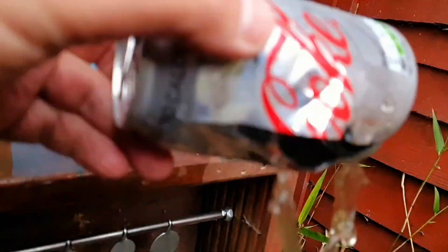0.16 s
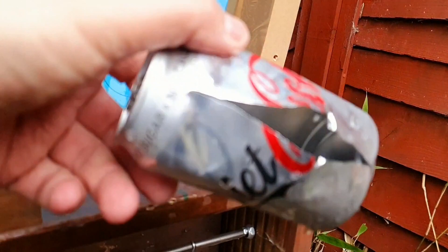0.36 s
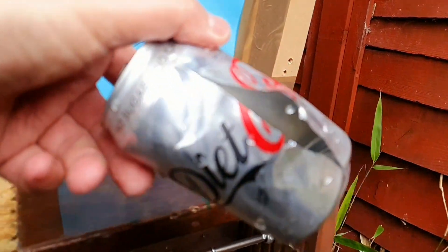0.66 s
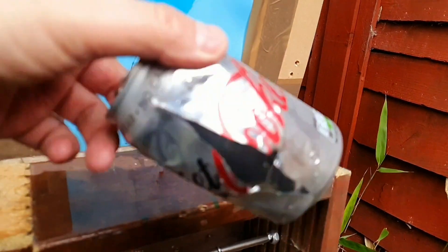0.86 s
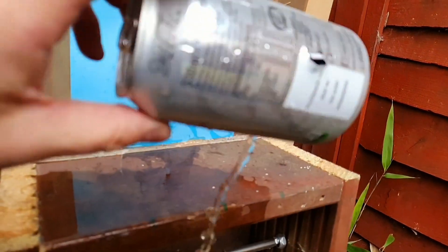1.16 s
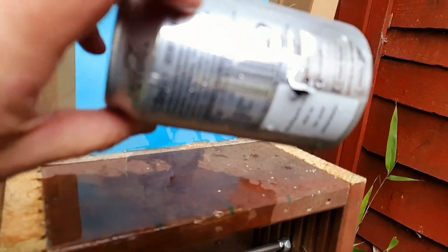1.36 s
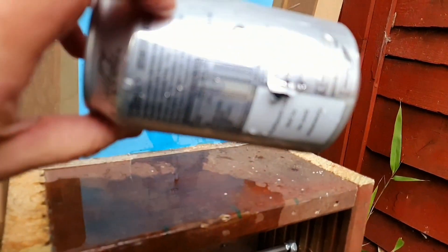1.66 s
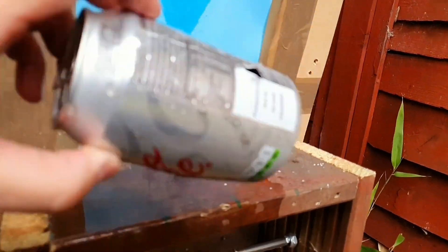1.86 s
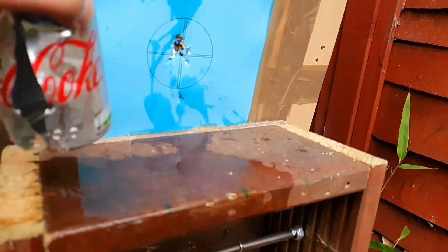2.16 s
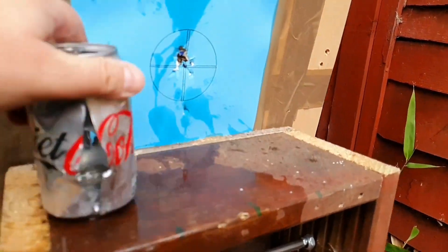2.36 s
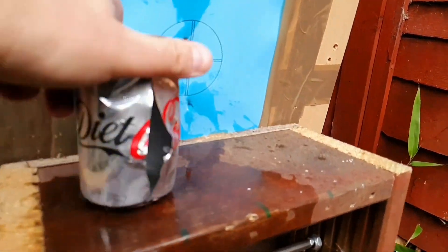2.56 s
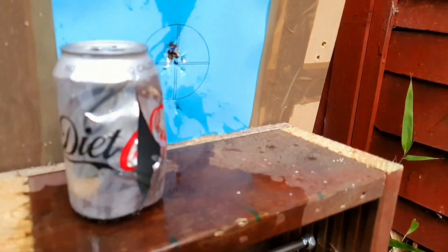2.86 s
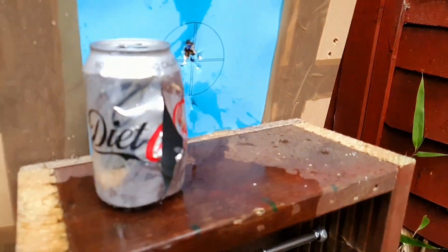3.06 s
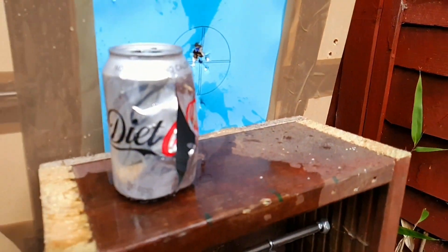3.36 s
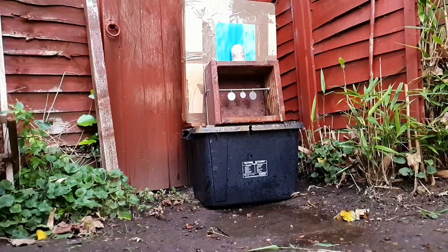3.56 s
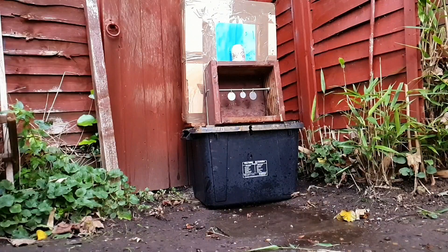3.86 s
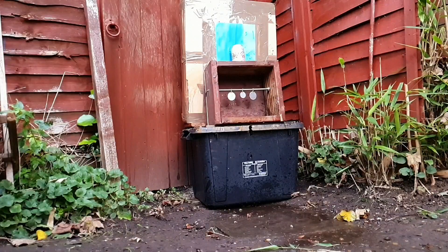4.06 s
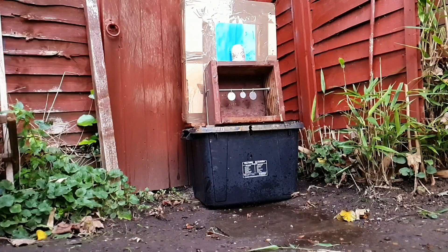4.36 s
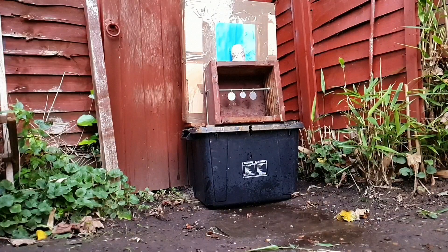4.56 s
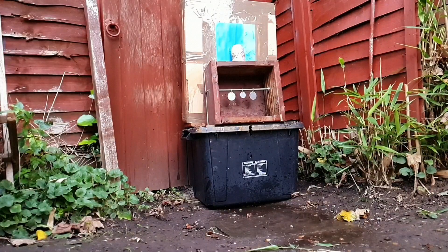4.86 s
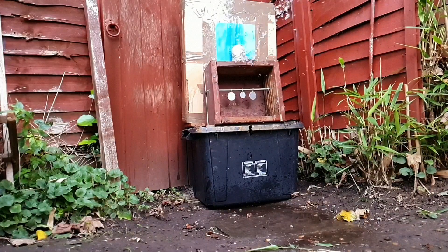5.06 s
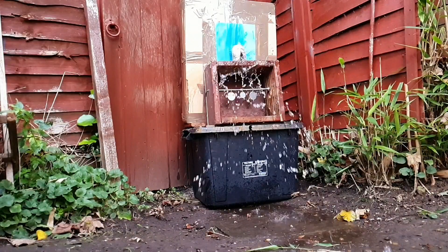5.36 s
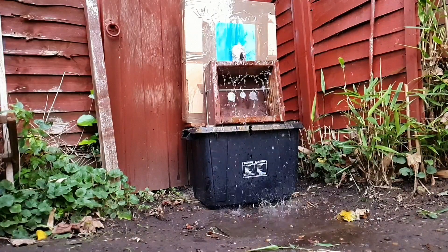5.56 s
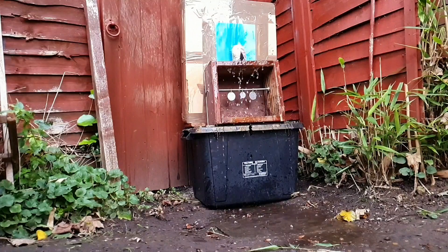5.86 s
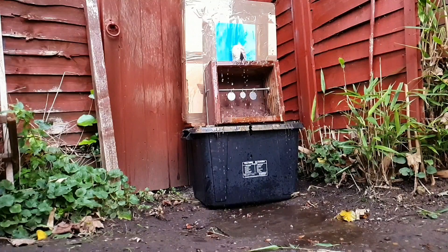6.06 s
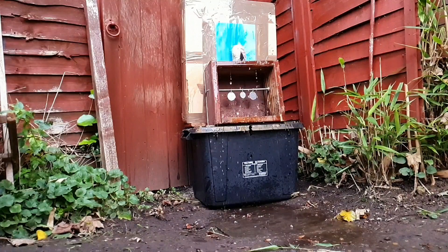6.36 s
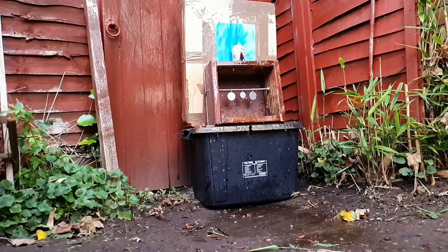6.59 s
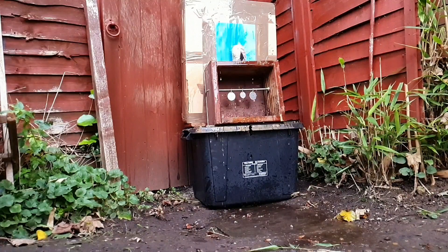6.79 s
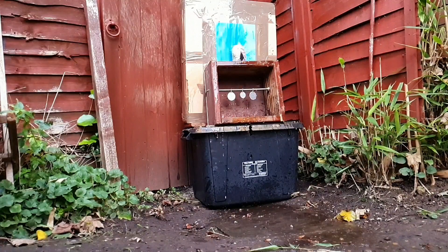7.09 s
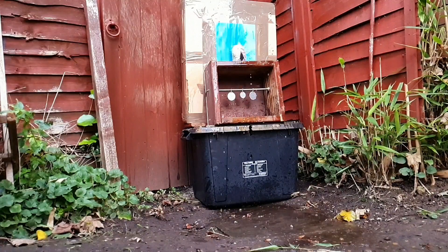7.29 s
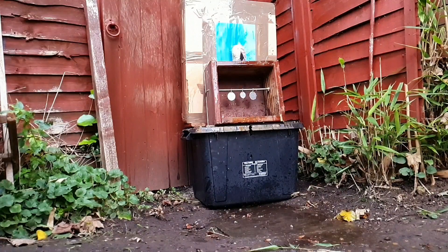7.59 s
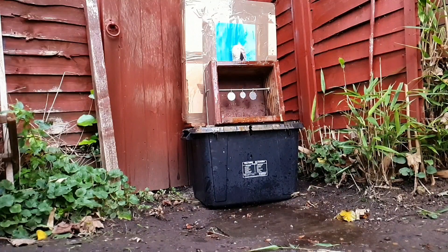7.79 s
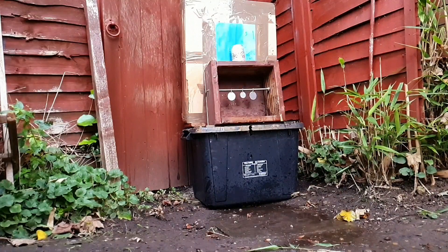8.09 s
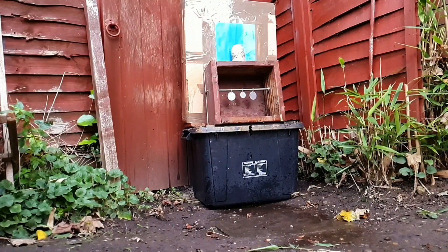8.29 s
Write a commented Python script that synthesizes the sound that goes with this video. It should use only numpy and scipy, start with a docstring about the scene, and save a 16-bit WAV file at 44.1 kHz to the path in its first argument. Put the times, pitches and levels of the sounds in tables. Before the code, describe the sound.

Stereo outdoor sound in a garden, with low traffic rumble, soft tyre hiss and gliding engine hums throughout. From 0 to 0.8 s fingers rustle a torn wet can close by: crisp foil snaps, hollow thumps, and a hard metallic pop near 0.63. A few lighter snaps come around 1.45 to 1.7. An engine note swells near 2.3; at 2.41 the can knocks onto a wooden box, bright and ringing, then rocks with faint thumps until 2.75. Total silence at 3.45 to 3.52 gives way to low wind buffeting, mostly left, around 3.6. At 4.98 an air rifle cracks with a thud and air hiss, and 0.04 s later the pellet smacks the can, clanking, with a short yard tail. Drops follow, densest with spray at 5.5 to 5.8, thinning by 6.6. Engine hum rises in pulses to 7.8; a second silence at 7.86 ends in a softer wind bump, then road rumble until 8.4.

```python
"""In a garden by a road a hand turns a torn drink can, with rustles, snaps and hollow thumps, and stands it on a
wooden box, where it rocks and rings in its shell modes. After a short silence an air rifle fires: noise bursts,
damped rings and sharp echoes; the pellet bursts a can of water, and spray and drops are ticks, tones and noise.
Traffic is shaped noise behind, with engine notes that glide, most of them upward, as harmonic orders.
Wind, low noise mostly in the left microphone port, follows each of two silences."""
import sys
import numpy as np
from scipy import signal
from scipy.fft import rfft, irfft, next_fast_len
from scipy.io import wavfile
from scipy.ndimage import uniform_filter1d

SR = 44100
rng = np.random.default_rng(int(sys.argv[2]) if len(sys.argv) > 2 else 0)


def transcribe(u):
    """Save the signal u as a 16-bit wav file named by the first command-line argument.

    u: samples, shape (n,) or (channels, n), limited to [-1, 1]; the rate is SR.
    q: integer samples, one column per channel.
    """
    v = np.clip(np.atleast_2d(u).T, -1, 1)
    q = np.round(v * 32767).astype(np.int16)
    wavfile.write(sys.argv[1], SR, q)


N = 371763  # samples


def amp(db):
    """Level law: decibels to amplitude gain."""
    return 10 ** (np.asarray(db) / 20)


def evened(x):
    """Normalisation: scales to rms 1."""
    return x / np.sqrt(np.mean(x ** 2) + 1e-20)


def read(points, hz):
    """Interpolation of a curve on a logarithmic frequency axis."""
    f, value = np.transpose(points)
    return np.interp(np.log(hz + 1), np.log(f + 1), value)


def columns(rows):
    """Linear interpolation: start time and each column of a curve, sample by sample."""
    s, *values = np.transpose(rows)
    t = np.arange(s[0], s[-1], 1 / SR)
    return s[0], [np.interp(t, s, v) for v in values]


def add(mix, s, sound):
    """Superposition: mixes a sound in at s seconds."""
    part = mix[:, round(s * SR):][:, :sound.shape[-1]]
    part += sound[..., :part.shape[-1]]


def panned(db):
    """Level difference between the channels: gains for left over right in dB."""
    return amp(np.array([db / 2, -db / 2])).reshape(2, -1)


def sine(hz, t):
    """Simple harmonic motion from zero phase."""
    return np.sin(2 * np.pi * hz * t)


def coloured(x, spectrum):
    """Spectral filtering without phase shift, then scaling to rms 1."""
    size = next_fast_len(x.shape[-1])
    gain = amp(read(spectrum, np.fft.rfftfreq(size, 1 / SR)))
    return evened(irfft(rfft(x, size) * gain, size)[..., :x.shape[-1]])


def noise(count, spectrum, same, size, t60=((1, 1e3),), patchy_db=0.):
    """Short-time spectral synthesis: random stereo frames with set coherence, drifting patches and band decay."""
    frames, hz = count * 4 // size + 5, np.fft.rfftfreq(size, 1 / SR)
    a, b, c, d, patches = rng.standard_normal((frames, len(hz), 5)).T
    patches = uniform_filter1d(patches, size=8, axis=0)
    patches = evened(uniform_filter1d(patches, size=8, axis=1))
    like = np.clip(read(same, hz), -1, 1)[:, None]
    left = a + 1j * b
    right = like * left + np.sqrt(1 - like ** 2) * (c + 1j * d)
    elapsed = np.arange(frames) * size / 4 / SR
    fall_db = 60 * elapsed / np.maximum(read(t60, hz), .005)[:, None]
    level_db = read(spectrum, hz)[:, None] + patchy_db * patches - fall_db
    z = np.array([left, right]) * amp(level_db)
    return signal.istft(z, nperseg=size, noverlap=size * 3 // 4)[1][:, :count]


# left-right likeness of diffuse sound: hz [Hz], likeness [-1 to 1]
DIFFUSE_LIKENESS = [(60, 0.37), (130, -0.47), (290, 0.8), (480, .6), (700, -0.2), (1410, -0.23),
                    (3100, 0.16), (6820, -0.2), (15000, -0.041)]


def burst(db, spectrum, t60, seconds, rise, patchy_db=2.5):
    """Transient noise decaying by band: its first 5 ms are set to db before a linear rise of rise seconds."""
    x = noise(round(seconds * SR), spectrum, DIFFUSE_LIKENESS, size=128, t60=t60, patchy_db=patchy_db)
    head = np.sqrt(np.mean(x[:, :SR // 200] ** 2))
    return amp(db) * x / head * np.minimum(np.arange(x.shape[1]) / SR / rise, 1)


def grains(count, per_s, spread_db, spectrum, share):
    """Shot noise: unequal random ticks modulate smooth noise, unrelated in the two ports."""
    sizes = amp(spread_db * np.minimum(rng.exponential(1, (count, 2)), 4))
    ticks = sizes * (rng.random((count, 2)) < per_s / SR)
    spread = signal.lfilter([1], [1, -.97], ticks.T)  # decay constant under a millisecond
    modulation = 1 - share + share * evened(spread)
    return coloured(rng.standard_normal((count, 2)).T * modulation, spectrum)


# traffic levels: start_s [s], hiss_db [dB], rumble_db [dB]
ROAD_LEVELS = [(0.0, -45.5, -39), (0.6, -45.5, -39.5), (1.2, -44, -35.5), (1.93, -45, -31),
               (2.46, -43.5, -36), (2.62, -47, -34), (3.33, -49, -38.5), (3.65, -46.5, -41.5),
               (3.9, -49.5, -34), (4.75, -50, -35.5), (5.0, -51, -42.5), (5.26, -56, -40.5),
               (5.5, -53.5, -43), (6.33, -54, -44), (6.52, -50, -35.5), (7.05, -46.5, -33.5),
               (7.5, -45.5, -33.5), (7.84, -44.5, -31), (8.43, -51, -38.5)]
# tyre hiss and rumble spectra: hz [Hz], density_db [dB per Hz]
HISS_SPECTRUM = [(88, -32), (150, -11.5), (215, -9), (260, -14), (460, -16.5), (535, -16), (876, -13),
                 (2140, -24), (3010, -35), (4000, -34.5), (5120, -40.5), (6800, -40), (7400, -49),
                 (11400, -53.5), (14000, -70.5)]
RUMBLE_SPECTRUM = [(12, -49), (20, -23), (39, -1), (59, 2), (72, 4.5), (113, -12), (206, -20), (300, -27.5),
                   (390, -54), (660, -120)]
# left-right likeness of the rumble; wind stirs the open ground: start_s [s], likeness [0 to 1]
RUMBLE_LIKENESS = [(0, 0.99), (3.45, 0.94), (3.52, 0.61), (8.43, 0.55)]


def road():
    """Broadband noise of partial coherence: tyre hiss and low rumble of traffic."""
    s, hiss_db, rumble_db = np.transpose(ROAD_LEVELS)
    t = np.arange(N) / SR
    hiss = evened(noise(N, HISS_SPECTRUM, DIFFUSE_LIKENESS, size=1024, patchy_db=2.0))
    a, b = evened(noise(N, RUMBLE_SPECTRUM, [(1, 0.00044)], size=2048, patchy_db=3.0))
    like = np.interp(t, *np.transpose(RUMBLE_LIKENESS))
    rumble = np.array([a, like * a + np.sqrt(1 - like ** 2) * b])
    return amp(np.interp(t, s, hiss_db)) * hiss + amp(np.interp(t, s, rumble_db)) * rumble


# one row an engine note, its pitch gliding evenly: first_hz [Hz], last_hz [Hz],
# orders_db (2nd, 3rd, 4th) [dB], level (start_s [s], level_db [dB])
ENGINE_NOTES = [ (69.4, 57, (-27, -36, -33.5), [(0.0, -33), (0.14, -28.5), (0.22, -37.5), (0.42, -28.5),
                (0.55, -44)]), (102.4, 109, (-31, -44, -46), [(0.45, -46.5), (0.72, -36), (0.86, -48.5),
                (1.2, -47.5), (1.43, -33.5), (1.61, -39.5), (1.83, -33.5), (1.98, -34), (2.05, -31)]),
                (96.5, 112, (-28, -45.5, -44.5), [(2.12, -39), (2.25, -31), (2.34, -20), (2.4, -20.5),
                (2.44, -45)]), (56.3, 86, (-20, -32, -46), [(2.46, -40), (2.57, -24.5), (2.73, -23.5),
                (2.9, -30.5), (3.05, -30), (3.18, -23), (3.45, -44)]), (48.43, 81, (-20.5, -18.5, -23),
                [(5.5, -44.5), (5.85, -43.5), (6.15, -41), (6.25, -75), (6.33, -37), (6.45, -29.5),
                (6.62, -50), (6.72, -30), (6.83, -34), (6.91, -47.5), (6.98, -28), (7.15, -34),
                (7.185, -49), (7.22, -26), (7.36, -38.5), (7.45, -28), (7.54, -34.5), (7.6, -27),
                (7.86, -36.5)]), (60.15, 37, (-23, -32, -21), [(8.04, -50), (8.13, -32), (8.28, -40.5),
                (8.43, -30)]), ]
TREMBLE = .012  # rms share of the pitch
ORDERS_SMOOTH_S, ORDERS_WAVER_DB = 0.19, 5.5  # upper orders follow the level slowly; each comes and goes


def engine(first_hz, last_hz, orders_db, level):
    """Harmonic series: the firing note and its first orders, the pitch trembling a little."""
    s, (db,) = columns(level)
    count = len(db)
    tremble = evened(uniform_filter1d(rng.standard_normal(count), size=2000))
    pitch_hz = np.linspace(first_hz, last_hz, count) * (1 + TREMBLE * tremble)
    turns = np.cumsum(pitch_hz) / SR
    slow = uniform_filter1d(amp(db), round(ORDERS_SMOOTH_S * SR))
    waver = uniform_filter1d(rng.standard_normal((count, 3)).T, size=1800)
    waver = uniform_filter1d(waver, size=1800)
    orders = np.zeros(count)
    for k, order_db in enumerate(orders_db):
        gain = amp(order_db + ORDERS_WAVER_DB * evened(waver[k]))
        orders += gain * np.sin(2 * np.pi * (k + 2) * turns + k)
    note = amp(db) * np.sin(2 * np.pi * turns) + slow * orders
    return s, np.sqrt(2) * note * signal.windows.tukey(count, .08) * np.ones((2, 1))


# fingers on wet metal, one curve a passage: start_s [s], level_db [dB]
RUSTLES = [
    [(0.03, -49.5), (0.134, -50.5), (0.37, -61.5), (0.39, -59), (0.52, -52), (0.602, -45.5), (0.73, -51.5),
     (0.82, -80)],
    [(1.4, -68), (1.75, -68)],
]
# thin foil spectrum: hz [Hz], density_db [dB per Hz]
FOIL_SPECTRUM = [(880, -31.5), (1500, -2.5), (2620, -15), (2730, -24), (2890, -5.5), (3600, -9), (4330, -7),
                 (11000, -10.5), (15000, -15)]


def rustle(rows):
    """Stick-slip friction as shot noise: fingers crackle on wet thin metal."""
    s, (db,) = columns(rows)
    crackle = grains(len(db), per_s=500, spread_db=4.5, spectrum=FOIL_SPECTRUM, share=.5)
    return s, amp(db) * crackle * signal.windows.tukey(len(db), .05)


# torn aluminium snapping under the fingers: start_s [s], level_db [dB], centre_hz [Hz],
# octave_lower_db [dB], left_right_db [dB]
FOIL_SNAPS = [(0.0508, -37.5, 12500, -2, -10), (0.192, -32, 6440, -6, -2), (0.2073, -22.5, 9650, -16, -3),
              (0.2178, -27, 4400, -23, 7), (0.2276, -28, 10670, -4, -6), (0.2354, -29, 6960, -13, -2.5),
              (0.386, -32.5, 11370, -19, -10), (0.3958, -27.5, 5870, -43, 4),
              (0.4176, -26.5, 6150, -39, -4), (0.4447, -38, 5900, -16, 7), (0.4609, -23, 5470, -2, -0.5),
              (0.543, -30.5, 9690, -15, 0), (0.5634, -38, 4080, -25, 2), (0.5846, -35, 6030, -14, 3),
              (0.5973, -28, 9050, -17, -4), (0.6225, -31, 6440, -20, 4), (0.6262, -21.5, 4780, 3, -5),
              (0.7753, -30.5, 5870, -21, -3), (1.172, -55.5, 8900, -15, -4), (1.4531, -30, 8660, -6, -2.5),
              (1.6304, -34.5, 12300, -1, -3), (1.6495, -38.5, 13000, -10, -6), (1.6766, -31, 9840, -15, -3)]
SNAP_T60, FOIL_T60 = 0.018, 0.12  # s
SNAP_RING_DB, FOIL_DB = -1.1, -12.5  # against the snap's level


def snap(s, db, hz, low_db, pan_db):
    """Snap-through buckling: a fold of thin metal pops in a short burst, ringing at its centre."""
    shape = [(hz / 4, low_db - 22.5), (hz / 2, low_db), (hz / 1.2, np.maximum(low_db, -9.0)),
             (hz, 0), (hz * 1.26, -10), (hz * 4, -18)]
    pop = burst(db, shape, [(1, SNAP_T60)], 0.084, 0.0024)
    t = np.arange(pop.shape[1]) / SR
    ring = amp(db + SNAP_RING_DB - 60 * t / SNAP_T60) * sine(hz, t) * np.minimum(t / 0.001, 1)
    foil = burst(db + FOIL_DB, FOIL_SPECTRUM, [(1, FOIL_T60)], 0.12, 0.0021)[:, :pop.shape[1]]
    return s, panned(pan_db) * (pop + ring + foil)


# soft blows that ring only the hollow of a can: start_s [s], level_db [dB],
# tilt_db (towards the upper modes) [dB per octave], lowest_hz [Hz], lowest_t60 [s]
CAN_THUMPS = [(0.1925, -27, 7, 495, 0.17), (0.202, -32.5, -9.5, 502, 0.22), (1.449, -34, 1, 499, .1),
              (2.472, -31, 5, 480, .06), (2.51, -35, -1, 480, 0.068), (2.553, -33.5, 2, 440, .07),
              (2.637, -25.5, -7, 474, 0.053), (2.647, -36, -3, 470, .07), (2.746, -32.5, -3, 462, 0.065),
              (2.755, -36.5, 1.5, 525, 0.077), (5.018, -20.5, -10, 398, 0.066),
              (5.031, -22.5, -5, 480, 0.077), (5.062, -30, 1, 499, 0.094), (5.075, -25, -6, 500, 0.13),
              (5.094, -41, 2, 490, 0.071), (5.108, -45, 3, 499, .05), (5.119, -37, -9.5, 240, 0.043),
              (5.157, -34, -4.5, 380, 0.066), (5.168, -33, -12, 503, 0.047), (5.186, -43, 0, 480, .05)]
# upper modes of the hollow: hz [Hz], level_db [dB], t60 [s]
HOLLOW_MODES = [(644, -5, 0.043), (802, -4.5, 0.045), (1030, -12, 0.026), (1550, -14, 0.031)]


def thump(s, db, tilt_db, low_hz, low_t60):
    """Modal synthesis: low modes of the hollow can, softly excited; dents and water shift the lowest."""
    t = np.arange(round(.2 * SR)) / SR
    modes = 0
    for f, g, t60 in [(low_hz, -3.5, low_t60)] + HOLLOW_MODES:
        tilted_db = g + tilt_db * np.log2(f / HOLLOW_MODES[0][0])
        modes = modes + amp(tilted_db - 60 * t / t60) * sine(f, t)
    return s, amp(db) * modes * np.minimum(t / 0.0015, 1) * panned(0)


# short metal clanks of a dent popping out, spring, piston and struck can:
# start_s [s], level_db [dB], pitch_hz [Hz], t60 [s], left_right_db [dB]
METAL_CLANKS = [(.4625, -22, 2570, 0.015, 0), (.463, -29, 1890, .012, 0), (.6268, -25, 1490, .012, 0),
                (.6268, -20, 1870, 0.014, 6), (.627, -19.5, 2420, 0.013, 13),
                (.627, -17.5, 3060, 0.013, -12), (.6272, -19, 3560, .014, 11), (.6275, -19, 4500, .012, 2),
                (5.035, -25, 790, .08, 2), (5.063, -35, 800, 0.23, -0.5), (4.9768, -11.5, 1905, .03, 3),
                (4.9775, -15.5, 5120, .02, 0.5), (4.986, -18, 1035, 0.04, 1),
                (4.988, -17.5, 1940, .035, 0.5), (5.0146, -7.5, 460, 0.026, -0.5),
                (5.0146, -9, 3600, .02, 0.5), (5.0165, -10.5, 2240, .02, 2.5),
                (5.0147, -11, 1390, .02, 1.5), (5.0185, -14.5, 1590, 0.021, 1), (5.019, -16, 5030, .015, 1),
                (5.03, -19, 1700, .04, -0.5), (5.058, -27.5, 2920, .03, 6), (5.07, -26, 3600, 0.026, 1),
                (5.097, -37, 1520, .025, 0), (5.108, -31, 2270, .03, 0), (5.131, -32, 2000, .04, 0),
                (5.16, -42, 1910, 0.027, 0), (5.174, -35, 840, 0.029, 0), (5.1126, -32, 1900, .05, -2),
                (5.116, -38, 3700, .04, 4)]
PORT_LAG_S = .00015  # the right port hears a clank later


def clank(s, db, hz, t60, pan_db):
    """Damped oscillator: one quickly dying ring with a time difference between the ports."""
    t = np.arange(round(.15 * SR)) / SR
    ring = sine(hz, t - np.array([[0], [PORT_LAG_S]]))
    return s, panned(pan_db) * amp(db - 60 * t / t60) * ring * np.minimum(t / 0.00086, 1)


# the can set down and rocking: start_s [s], level_db [dB], shell_ring_db [dB]
CAN_KNOCKS = [(2.4142, -10.5, 1), (2.47, -49, -8), (2.495, -41.5, -2), (2.54, -43.5, -10),
              (2.556, -44.5, -7), (2.646, -47.5, -1), (2.656, -46.5, -12), (2.748, -56.5, -8)]
# modes of the shell: hz [Hz], level_db [dB], t60 [s]
SHELL_MODES = [(511, -11, 0.057), (710, -3.5, 0.04), (883, -3, 0.06), (1017, -0.5, 0.062),
               (1344, -10.5, 0.13), (1647, 5.5, 0.031), (1805, -6.5, 0.12), (2100, -4, 0.07),
               (2320, -8.5, .08), (2830, -9.5, 0.11), (3200, -1.5, 0.084), (3540, 0, 0.11),
               (4010, -6, 0.12), (4190, -6.5, 0.059), (5230, -4, 0.077), (6000, -3, 0.071)]
# rattle of the torn edge, spectrum: hz [Hz], density_db [dB per Hz]; and decay: hz [Hz], t60 [s]
CLATTER_SPECTRUM = [(180, -40), (300, -25.5), (500, -9), (763, -4.5), (884, -3), (1330, -3.5), (2070, -6),
                    (3490, -0.5), (14000, -24), (15000, -34.5)]
CLATTER_DECAY = [(400, 0.069), (1000, 0.07), (2000, 0.15), (5000, 0.11), (12000, 0.21)]
KNOCK_TREBLE_DB, CLATTER_DB = -9, -2.5


def knock(s, db, ring_db):
    """Impact excitation of modes: a blow rings the shell and rattles the torn edge; the right ring lags."""
    t = np.arange(round(.25 * SR)) / SR
    port_t = t - np.array([[0], [.0002]])
    tilt = [(1400, 0.00043), (2600, KNOCK_TREBLE_DB)]
    phases = rng.uniform(0, 3.16, len(SHELL_MODES))
    ring = 0
    for (f, g, t60), phase in zip(SHELL_MODES, phases):
        mode = np.sin(2 * np.pi * f * port_t + phase)
        ring = ring + amp(g + read(tilt, f) - 60 * t / t60) * mode
    colour = [(f, g + read(tilt, f)) for f, g in CLATTER_SPECTRUM]
    clatter = burst(db + CLATTER_DB, colour, CLATTER_DECAY, .25, 0.0015, patchy_db=3.4)
    return s - .001, amp(db + ring_db) * ring * np.minimum(t / 0.0013, 1) + clatter


# cracks of the can's rim on the box, of muzzle and pellet strike, and echoes off sheds and fences:
# start_s [s], level_db [dB]
SHARP_SLAPS = [(2.4146, -27.5), (4.978, -29), (5.0154, -23.5), (5.022, -36.5), (5.025, -35.5),
               (5.033, -37.5)]


def slap(s, db):
    """Blast-wave pulse: a sudden pressure step that decays and overshoots, coloured and inverted."""
    u = np.arange(300) / SR / 0.00022
    pulse = np.pad((1 - u) * np.exp(-u), 300)
    crack = coloured(pulse, [(200, -22.5), (700, 1.0), (5000, -2.5), (9000, -15.0)])
    return s - 300 / SR, -amp(db) * crack * np.ones((2, 1))


# wind on the ports: heard_from_s [s], strongest_push_s [s], following_db [dB]
WIND_GUSTS = [(3.52, 3.685, -2.5), (7.93, 7.962, -6.5)]
# wind spectrum: hz [Hz], density_db [dB per Hz]
GUST_SPECTRUM = [(15, -36), (25, -10.5), (53, 2.5), (102, -6.5), (141, -7.5), (221, -18), (387, -37.5),
                 (472, -40), (600, -49), (780, -84), (1320, -120)]
# one shape for every gust: time_from_push_s [s], level_db [dB], left_right_db [dB]
GUST_COURSE = [(-.165, -30, 11.5), (-.08, -22, 14.5), (-.04, -27.5, 5.5), (0, -17, 13), (.06, -26, 6),
               (.12, -40, 5), (.16, -25, -2), (.22, -40, -7), (.26, -38.5, -3), (.33, -30, 9),
               (.36, -55, -10)]


def gust(s, push, after_db):
    """Turbulent pressure: lumpy low noise, almost unrelated in the two ports."""
    first, (db, pan_db) = columns(GUST_COURSE)
    from_push = first + np.arange(len(db)) / SR
    db = db + after_db * np.clip((from_push - .06) / .06, 0, 1)
    lumps = evened(noise(len(db), GUST_SPECTRUM, [(1, 0.115)], size=2048))
    unheard = max(round((s - push - first) * SR), 0)
    return s, (amp(db) * panned(pan_db) * lumps)[:, unheard:]


# low pushes of air, wind on the ports and the thud of the shot:
# start_s [s], level_db [dB], pitch_hz (before its glide) [Hz], length [nominal cycles], left_right_db [dB]
AIR_BUMPS = [(3.585, -16, 150, 3.2, 13), (3.676, -18.5, 114.3, 1.6, 12), (7.952, -19, 89.2, 2.8, 13),
             (4.9745, -11, 108, 2.1, 4), (5.085, -30, 69.4, 1.7, -1), (5.12, -32, 70, 1.5, 12),
             (5.205, -32, 60, 2.3, -4), (5.285, -33, 74, 2.2, 0)]


def bump(s, db, hz, cycles, pan_db):
    """Transient pressure oscillation: a few swings, slowing down."""
    u = np.arange(round(cycles / hz * SR)) / SR * hz
    swings = np.sin(2 * np.pi * (1.227 * u - 0.059 * u ** 2))
    return s, amp(db) * swings * np.hanning(len(u)) * panned(pan_db)


# parts of the shot: start_s [s], level_db [dB], spectrum (hz [Hz], density_db [dB per Hz]),
# decay (hz [Hz], t60 [s])
MUZZLE_BLAST = (4.9762, -18.5, [(35, -30.5), (60, -3), (220, -9.5), (480, -1), (835, -11), (1050, -11.5),
                (1330, -13), (2060, -5), (2420, -13.5), (3930, -6.5), (6000, -13), (14000, -24.5),
                (15000, -22)], [(100, .08), (500, 0.12), (1000, 0.28), (5000, 0.31), (12000, 0.25)])
JET = (4.986, -18.5, [(2000, -21), (5000, 1), (11000, -1), (15000, -6)], [(2000, 0.13), (12000, 0.22)])
PELLET_STRIKE = (5.0142, -13.5, [(88, -31), (150, -4), (728, 1.5), (1030, -16.5), (1570, -.6), (2700, -10),
                 (3970, -1.5), (6060, -5), (8100, -21.5), (12900, -21), (15000, -32.5)], [(300, 0.17),
                 (1500, 0.077), (6000, .05)])
YARD_TAIL = (5.02, -25.5, [(88, -40), (150, -18), (495, -16.5), (687, -30), (802, -13.5), (1130, -15),
             (4630, -22), (12900, -41), (15000, -43)], [(300, 0.45), (2000, 0.4), (6000, 0.36),
             (13000, 0.3)])
CRACKLE_DB, CRACKLE_S = 3.5, .003  # rms unevenness, smoothing time


def shot(s, db, spectrum, t60, rise):
    """Impulsive noise with band-wise decay: blast, air jet, strike or yard tail, crackling unevenly."""
    sound = burst(db, spectrum, t60, 0.35, rise, patchy_db=2.0)
    lumps = uniform_filter1d(rng.standard_normal(sound.shape[1]), round(CRACKLE_S * SR))
    return s, sound * amp(CRACKLE_DB * evened(lumps) - 0.5)


# course of the spray: start_s [s], level_db [dB]
SPRAY_LEVEL = [(5.2, -68.5), (5.5, -61.5), (5.525, -45.5), (5.6, -47), (5.67, -54.5), (5.81, -58),
               (6.28, -68), (6.7, -67), (7.1, -81)]
# pattering water spectrum: hz [Hz], density_db [dB per Hz]
WATER_SPECTRUM = [(710, -50), (1200, -21), (1450, -15), (1740, -12), (3960, -1), (7010, -7), (8660, -6.5),
                  (13800, -9.5), (15000, -10)]


def spray():
    """Shot noise of pattering water: dense unequal ticks over a smooth hiss."""
    s, (db,) = columns(SPRAY_LEVEL)
    patter = grains(len(db), per_s=900, spread_db=4.0, spectrum=WATER_SPECTRUM, share=.5)
    return s, amp(db) * patter * signal.windows.tukey(len(db), .05)


DROPLETS_PER_S, DROPLET_DB, DROPLET_SPREAD_DB = 300, -1, 4
DROPLET_LOW_HZ, DROPLET_TOP_HZ = 1695, 7060


def droplets():
    """Poisson arrivals of damped tones: many small drops, each a few cycles long, following the spray."""
    s, (db,) = columns(SPRAY_LEVEL)
    count = len(db)
    out, t = np.zeros((2, count)), np.arange(400) / SR
    pitches = np.geomspace(DROPLET_LOW_HZ, DROPLET_TOP_HZ, num=16)
    for hz in pitches:
        arrivals = rng.random(count) < DROPLETS_PER_S / SR / len(pitches)
        hits = arrivals * amp(DROPLET_SPREAD_DB * np.minimum(rng.exponential(1, count), 4))
        ring = sine(hz, t) * amp(-60 * t * hz / 16) * np.minimum(t / .0003, 1)  # t60 of 16 cycles
        out += panned(3.8 * rng.standard_normal()) * signal.oaconvolve(hits, ring)[:count]
    return s, amp(db + DROPLET_DB) * out


# single drops landing: start_s [s], level_db [dB], pitch_hz [Hz], tick_db [dB], splash_db [dB]
LANDING_DROPS = [(5.2069, -42.5, 2570, -17, -8), (5.2124, -40, 3030, -22, -12),
                 (5.2869, -45.5, 1620, -29, -14), (5.3172, -56, 1700, -15, 1.5),
                 (5.365, -53, 4400, -20, -3), (5.4226, -43.5, 5980, -21, -3),
                 (5.4565, -50.5, 1910, 4.5, -9), (5.4924, -50, 2550, -8, -6), (5.5218, -41.5, 6100, 1, -5),
                 (5.533, -35, 3720, -12, -1), (5.548, -41, 3800, 2, -3), (5.5717, -40.5, 4260, -2, 4),
                 (5.5845, -33.5, 3410, -6, 1.5), (5.6412, -41, 2760, -6, -4), (5.655, -21, 2800, -21, -6),
                 (5.6795, -36, 3860, -17, -4.5), (5.693, -46, 4200, -10, -2), (5.7144, -45, 4740, -5, -4),
                 (5.7348, -45, 2780, -14, -4), (5.743, -41, 3520, -25, -9), (5.756, -48, 1950, 3, -2),
                 (5.7665, -29.5, 2310, -13, -10), (5.8256, -55, 3797, -6, -9), (5.866, -57, 4680, -20, -8),
                 (5.8722, -35, 2640, -24, -6), (5.9334, -51, 1980, -2, -8), (6.132, -38.5, 1920, -16, -1.5),
                 (6.136, -48, 4430, -20, -2), (6.1755, -35.5, 2470, -16, 1), (6.194, -45.5, 5930, -25, -11),
                 (6.246, -59, 5000, -20, -9), (6.299, -63, 5000, -22, -13), (6.313, -54, 3760, -25, -18),
                 (6.4368, -51, 4650, -23, -7), (6.4662, -46.5, 3960, -23, 0), (6.5847, -50.5, 1720, -3, -5)]
SPLASH_T60, BUBBLE_T60 = 0.022, 0.026  # s
DROP_SCATTER_DB = 1.5  # left-right spread


def drop(s, db, hz, tick_db, splash_db):
    """Bubble resonance after impact: a tick and a blunt plop of three inharmonic tones, in a splash."""
    t = np.arange(round(.06 * SR)) / SR
    tones = hz * np.array([1, 1.3, 1.65]) * rng.uniform(.94, 1.06, 3) ** [0, 1, 1]  # lowest stays exact
    plop = 0
    for f, g in zip(tones, (0, -7.0, -8.0)):
        plop = plop + amp(g - 60 * t / BUBBLE_T60 * f / hz) * sine(f, t)
    plop = amp(db) * plop * np.minimum(t / 0.00098, 1)
    shape = [(hz / 2.7, -45), (hz / 1.7, -20), (hz, 0), (hz * 1.24, -3), (hz * 2.4, -22), (hz * 5, -45)]
    splash = burst(db + splash_db, shape, [(1, SPLASH_T60)], .06, 0.0024)
    tick = burst(db + tick_db, [(3000, -6.5), (8000, -9.5), (14000, -7)], [(1, 0.053)], .06, 0.00028)
    return s, panned(DROP_SCATTER_DB * rng.standard_normal()) * (plop + splash + tick)


def scene():
    """Superposition of all sources at the two microphone ports."""
    mix = road()
    for rows in RUSTLES:
        add(mix, *rustle(rows))
    for part, rise_s in ((MUZZLE_BLAST, .001), (JET, .008), (PELLET_STRIKE, .001), (YARD_TAIL, .02)):
        add(mix, *shot(*part, rise_s))
    add(mix, *spray())
    add(mix, *droplets())
    for table, source in ((ENGINE_NOTES, engine), (FOIL_SNAPS, snap), (CAN_THUMPS, thump),
                          (METAL_CLANKS, clank), (CAN_KNOCKS, knock), (SHARP_SLAPS, slap),
                          (WIND_GUSTS, gust), (AIR_BUMPS, bump), (LANDING_DROPS, drop)):
        for row in table:
            add(mix, *source(*row))
    return mix


# the bass of the left port drops out: start_s [s], end_s [s]
BASS_LULLS = [(4.01, 4.47), (4.81, 5.02), (6.21, 6.29), (8.295, 9.4)]
LULL_HZ, LULL_DEPTH = 191, 0.94  # below which, and what share of it, the bass drops out
# short silences: start_s [s], end_s [s]
SHORT_SILENCES = [(3.446, 3.522), (7.862, 7.936)]
MIC_LOW_HZ, MIC_TOP_HZ, EDGE_HZ = 39, 14700, 15865  # microphone's ends and the band limit


def record(dry):
    """Linear filtering and gating: left bass lulls, two silences, the microphone's ends, the band limit."""
    t = np.arange(N) / SR
    lull = sum(np.clip(np.minimum(t - a, b - t) / .008, 0, 1) for a, b in BASS_LULLS)
    low = signal.sosfiltfilt(signal.butter(3, LULL_HZ, fs=SR, output="sos"), dry[0])
    ports = np.array([dry[0] - LULL_DEPTH * lull * low, dry[1]])
    heard = np.ones(N)
    for a, b in SHORT_SILENCES:
        heard *= np.clip(np.maximum((a - t) / 0.0013, (t - b) / 0.0093), 0, 1)
    bass = signal.butter(2, MIC_LOW_HZ, "high", fs=SR, output="sos")
    mic_top = signal.firwin(201, MIC_TOP_HZ, fs=SR)
    edge = signal.firwin(511, EDGE_HZ, window=("kaiser", 9), fs=SR)
    taps = np.convolve(mic_top, edge)
    return signal.oaconvolve(signal.sosfilt(bass, ports) * heard, taps[None], "same")


dry = scene()
out = record(dry)
transcribe(out)
```